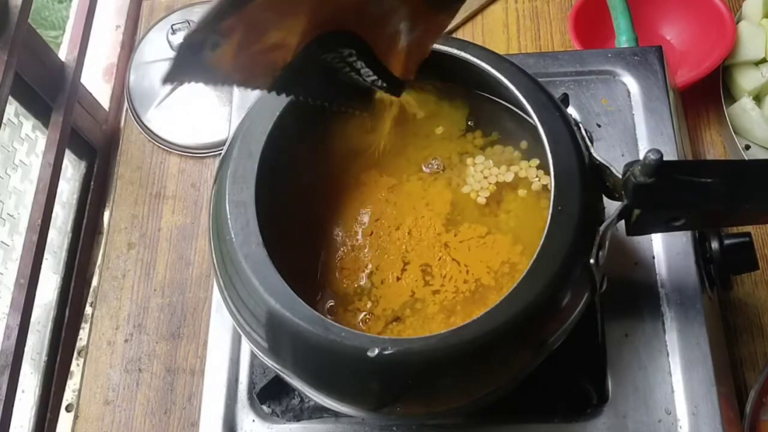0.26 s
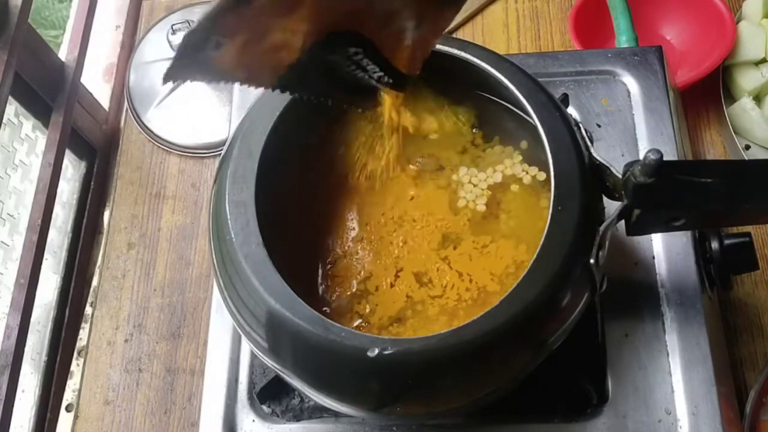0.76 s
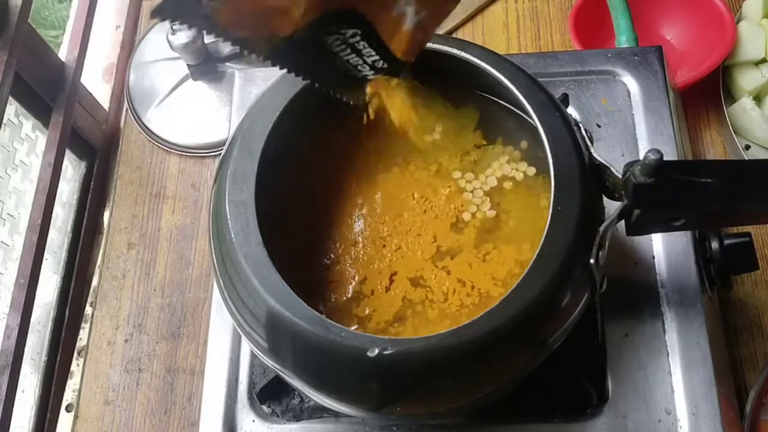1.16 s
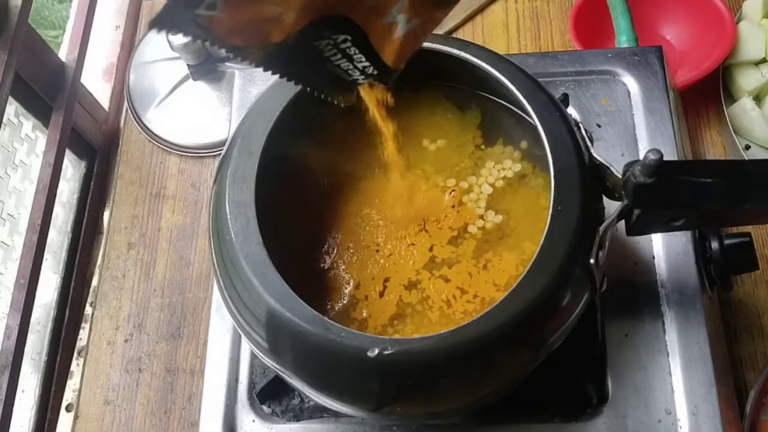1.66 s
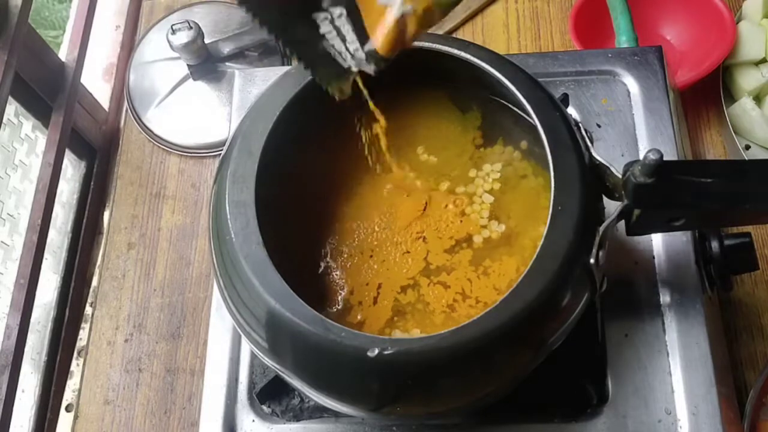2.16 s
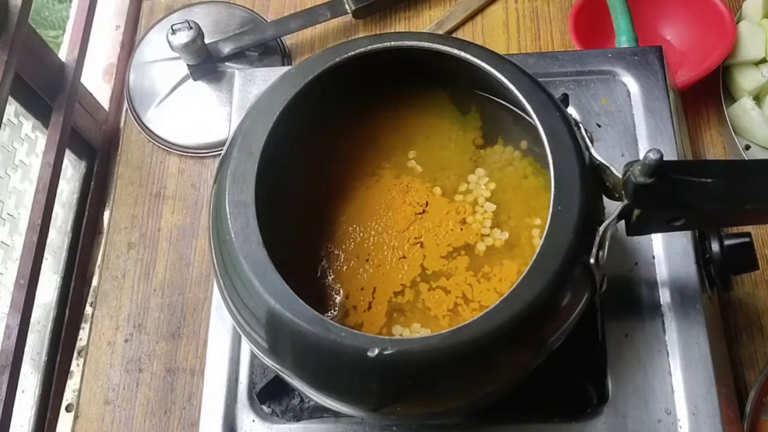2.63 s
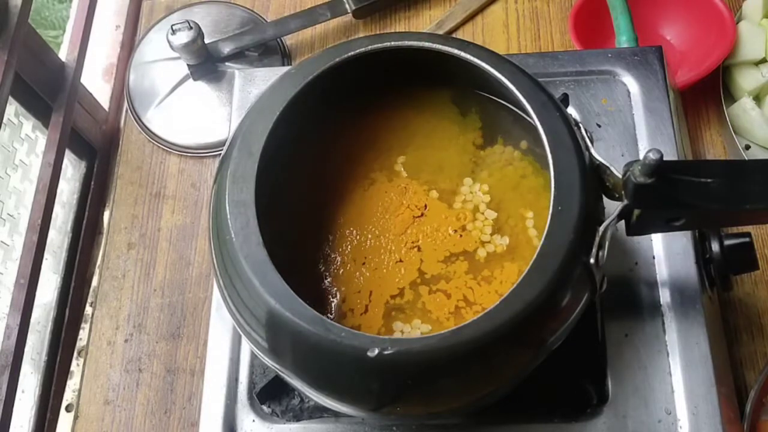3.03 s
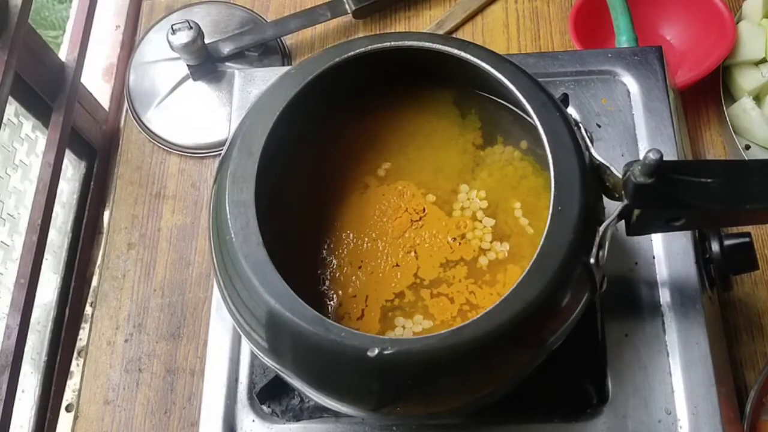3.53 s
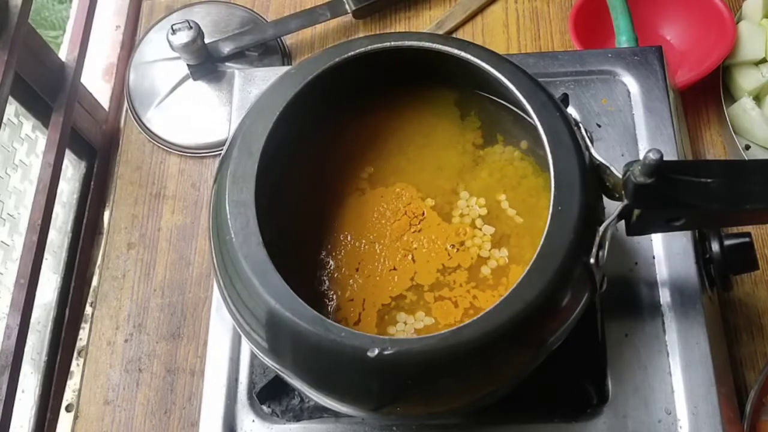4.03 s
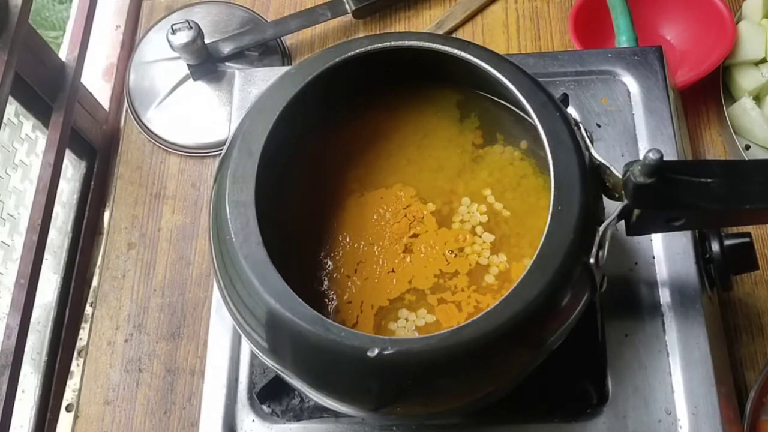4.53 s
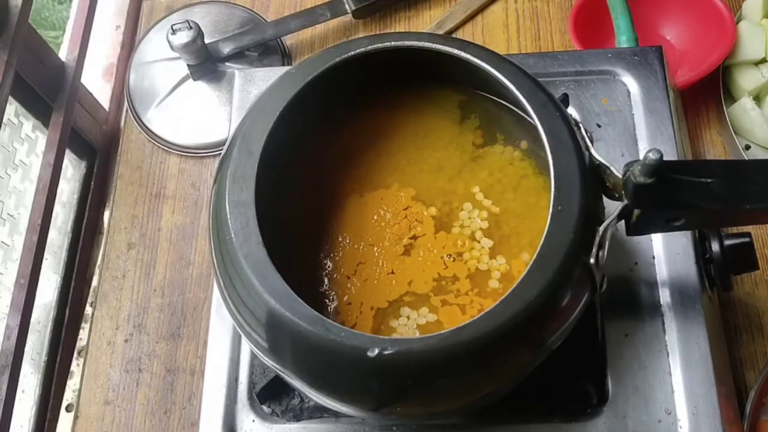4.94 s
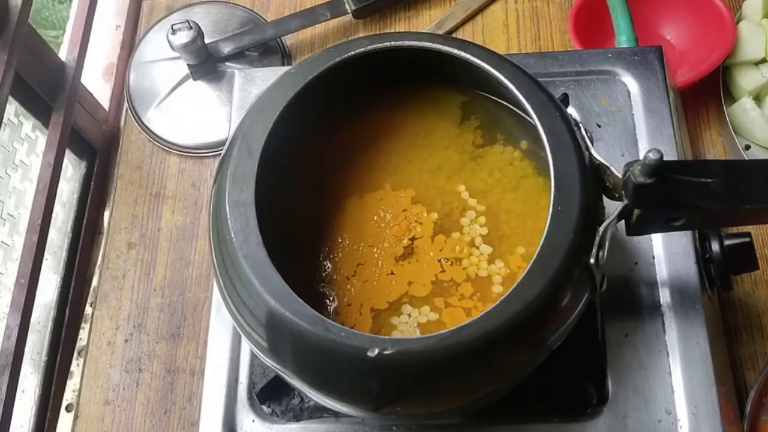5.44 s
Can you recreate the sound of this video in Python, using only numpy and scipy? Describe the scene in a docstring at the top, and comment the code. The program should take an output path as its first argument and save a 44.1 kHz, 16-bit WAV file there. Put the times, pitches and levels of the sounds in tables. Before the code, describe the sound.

A stiff plastic packet is squeezed and shaken over a pot, rustling softly while its creases let go in sharp snaps. One loud crack comes early, followed by two faint tones. Scattered snaps thin to a lull before the hardest flurry hits midway. Near the end the rustle swells and one more faint tone sounds. The packet is heard close by in a hard-walled kitchen with a low hum and thin hiss.

```python
"""A stiff plastic packet is squeezed and shaken over a pot in a hard-walled kitchen.
Tiny creases rustle from the start, over a low wavering hum and thin hiss. Bigger creases buckle in
sharp snaps that build to a crack just after half a second, and two faint tones ring. Scattered snaps
thin to a lull, then the hardest flurry hits at 3 s. The rustle surges near 4.9 s and one more tone
rings among the last snaps. The walls throw back snaps, rustle and tones throughout."""
import sys
import numpy as np
from scipy import signal
from scipy.io import wavfile
from scipy.ndimage import uniform_filter1d

SR = 44100
rng = np.random.default_rng(int(sys.argv[2]) if len(sys.argv) > 2 else 0)


def unload_wav(signal):
    """Save mono or channel-first audio to the path in sys.argv[1] as 16-bit WAV at rate SR, clipped to [-1, 1]."""
    wavfile.write(
        sys.argv[1],
        SR,
        np.round(np.clip(np.atleast_2d(signal).T, -1, 1) * 32767).astype(np.int16),
    )


N = 250973

# Single creases letting go. Each row: start in seconds, level in dB, pitch of the hollow in Hz,
# body and top weights in dB, decay time in ms.
CREASE_SNAPS = [(0.106, -37, 970, -18, -24, 1.4), (0.164, -38.5, 1760, -20.5, -21.5, 1.8),
                (0.181, -38.5, 1020, -36, -32, 2), (0.285, -38, 4140, -29, -8, 1.3),
                (0.309, -29, 990, -19, -28.5, 0.99), (0.335, -23, 2760, -18, -14, 1.66),
                (0.351, -16, 3220, -25.5, -18, 1.16), (0.392, -29, 2420, -16.5, -13, 1.33),
                (0.519, -41, 4490, -20, -12, 1.3), (0.533, -37, 3230, -19, -24, 1.3),
                (0.558, -31.5, 2030, -1, -11, 1.4), (0.568, -7.5, 4860, -21, -2.5, 2.2),
                (0.575, -20, 3360, -20, -15.5, 1.4), (0.623, -32, 3870, -31, -14, 1.1),
                (0.738, -43.5, 1130, -9, -22, 0.95), (0.757, -39.5, 970, -9, -27, 0.82),
                (0.777, -48, 961, -11, -19, 1.7), (1.079, -45, 4050, -31, -23, 1.3),
                (1.102, -46.5, 2180, -13, -18, 1.6), (1.163, -16, 5130, -23.5, -12, 1.8),
                (1.385, -37, 3890, -18, -10, 0.85), (1.401, -36, 4800, -23, -17, 2.5),
                (1.419, -40.5, 3920, -28, -17, 1.3), (1.429, -41, 3280, -27, -21, 1.3),
                (1.447, -35.5, 2710, -18, -13, 1.9), (1.501, -35, 2420, -18, -27, 1.15),
                (1.545, -36.5, 1720, -27, -21, 1.5), (1.557, -36.5, 2440, -22, -26, 0.97),
                (1.579, -23.5, 3220, -13.5, -11.5, 1.6), (1.728, -41, 1630, -19, -16, 1.4),
                (1.777, -32, 2730, -19, -18, 2), (1.807, -38.5, 3280, -30, -16, 1.7),
                (1.849, -20.5, 1510, -17, -14.5, 1.5), (1.972, -19, 4730, -36, -7, 1.85),
                (1.979, -23, 3360, -9, -11, 1.2), (2.129, -33.5, 3680, -22.5, -17, 1.27),
                (2.145, -36, 2900, -23, -15, 2.1), (2.182, -30, 2780, -20.5, -17.5, 1.85),
                (2.372, -40.5, 2530, -49, -12, 1.15), (2.638, -46, 1680, -9, -35, 1.5),
                (2.891, -39, 2480, -42, -11.5, 1.6), (2.961, -27, 3420, -27, -16, 1.3),
                (2.965, -41, 4020, -8, -17, 1.3), (2.968, -3.5, 4300, -27, -1, 1.03),
                (2.981, -32, 4370, 0, -15, 1.9), (2.993, -18, 2530, -30, -11, 0.94),
                (3.008, -31.5, 3720, -40, -28, 1.6), (3.039, -39, 1090, -18, -18, 1.3),
                (3.048, -26.5, 4120, -19, -16, 1.13), (3.056, -48, 1110, -14, 8, 1.7),
                (3.091, -10, 4100, -34.5, -23, 1.42), (3.145, -23.5, 4500, -13, -12, 1.7),
                (3.264, -40.5, 2020, -33, -6, 1.7), (3.302, -53, 3670, -30, -20, 1.5),
                (3.362, -43, 2440, -30, -28, 1.3), (3.369, -34.5, 3740, -38, -33, 1.7),
                (3.389, -32, 3920, -25.5, -21.5, 1.8), (3.441, -32.5, 3660, -38, -28, 1.5),
                (3.451, -30.5, 3760, -31.5, -20, 1.2), (3.533, -39.5, 2000, -19, -16, 1.4),
                (3.629, -21.5, 4640, -16.5, -5.5, 1.68), (3.926, -31.5, 4740, -27, -16, 2.5),
                (3.951, -35.5, 1980, -18.5, -30, 1.9), (4.003, -42.5, 3170, -19, -24, 1.5),
                (4.048, -34, 4630, -17, -16.5, 2.1), (4.054, -26, 2550, -18, -11, 1.2),
                (4.232, -46.5, 1730, -22, -28, 1.1), (4.254, -43, 1770, -20, -32, 0.94),
                (4.269, -41.5, 1730, -28, -27, 1.6), (4.486, -43, 4260, -16, -6.5, 1.3),
                (4.544, -43.5, 3800, -24, -19, 1.5), (4.78, -44, 3650, -26, -20, 2.4),
                (4.901, -34, 960, -15, -10, 2.8), (4.909, -25, 3730, -24, -6, 3.1),
                (4.957, -40, 2430, -13, -11, 1.5), (5.079, -36.5, 1260, -18.5, -13, 1.9),
                (5.166, -44, 1010, -13, -22.5, 1.1), (5.338, -31.5, 4470, -13, -1, 1.3),
                (5.391, -42.5, 2060, -21.5, -36, 1.6), (5.438, -43.5, 2720, -8.5, -21, 1.1)]
# Where a snap's body, middle and top lie, each in Hz.
SNAP_BANDS_HZ = [1027, 3120, 13200]
# Colour of the plastic film. Each row: frequency in Hz, relative level in dB.
FILM_COLOUR = [(350, -28.5), (520, -26), (700, -12.5), (1000, -5), (1500, -5), (2100, -1.5), (4100, -2.5),
               (5700, -7), (9000, 0), (12000, -2.5), (15000, 2.5)]
# How the hands work the packet. Each row: time in seconds, rustle level, body and treble gains in dB.
HANDLING = [(0, -66.5, 3.5, -9), (.25, -69, 10, -9), (.45, -63.5, -0.5, -12), (.78, -71.5, 6.5, -7.5),
            (1.0, -69, -3, -21), (1.35, -74.5, 5, -2), (1.45, -69.5, 3.5, -11), (1.9, -70, 7.5, -8.5),
            (2.2, -67, -3, -9.5), (2.6, -83.5, 15, 0), (2.7, -71.5, -8, -8), (2.85, -74, 4, -5),
            (2.95, -68, 2, -8), (3.2, -64, -1.5, -12), (3.6, -70.5, -2, -9), (3.76, -67, -1, -8),
            (3.9, -76.5, -10, -3), (4.27, -69, 6, -12), (4.42, -75.5, 8.5, -4), (4.55, -71, -7.5, -7),
            (4.76, -82, 0, 5.5), (4.79, -68, 4, 1.5), (4.87, -58.5, -0.5, -1.5), (4.91, -55.5, -5.5, -6.5),
            (4.96, -62.5, 5, -3.5), (5.14, -72.5, 5.5, -6), (5.18, -69.5, 6.5, -2.5), (5.4, -62.5, -1, -5),
            (5.52, -70, 3, -11), (5.69, -79, -4, 2)]
# Faint distant notes. Each row: start and end in seconds, pitch in Hz, level before the fade in dB.
FAR_TONES = [(.6, 0.975, 824.5, -54.5), (0.767, 0.866, 980, -63), (5.205, 5.44, 954, -58)]
# The kitchen's tail. Each row: frequency in Hz, seconds to fall by 60 dB.
KITCHEN_DECAY = [(600, 0.29), (1580, 0.16), (4180, 0.21), (11000, 0.14)]
# Slaps off the nearest surfaces. Each row: delay in seconds, gain in dB.
NEAR_ECHOES = [(.0012, -26), (.0045, -24), (.0068, -13.5)]
# Noise bands of the hum. Each row: centre in Hz, width in Hz, level in dB.
HUM_BANDS = [(122, 24, -79), (208.2, 6.3, -69.5), (246, 11, -72), (267.4, 49, -68)]
# Narrow bands standing in the hiss. Each row: centre in Hz, width in Hz, level in dB.
HISS_BANDS = [(965, 140, -79), (2357, 98, -76.5), (11060, 270, -72)]
# Low bands that swell and sink. Each row: centre in Hz, width in Hz.
SWELL_BANDS = [(122, 26), (340, 126), (640, 89)]
# Their fader moves. Each row: time in seconds, then the level in dB of each of the three bands.
SWELL_LEVELS = [(0, -79, -72.5, -100), (.35, -95, -69.5, -120), (.55, -69, -75, -70),
                (.9, -93, -71.5, -102), (1.3, -100, -79, -77.5), (1.47, -56.5, -78, -98),
                (1.7, -84, -75.5, -100), (2.4, -78, -75.5, -83.5), (2.9, -70, -86, -74.5),
                (3.05, -84, -65.5, -61.5), (3.3, -68.5, -78, -78.5), (3.75, -88, -72, -89),
                (4.27, -72.5, -69.5, -82), (4.74, -76, -82, -86.5), (4.86, -67, -66, -95),
                (5.1, -82, -72.5, -100), (5.69, -67, -74.5, -81)]
# Colour of the rumble. Each row: frequency in Hz, relative level in dB.
RUMBLE_COLOUR = [(24, -68.5), (40, -37), (70, -61.5), (113, -15), (177, -10), (207, 1), (388, -24.5),
                 (430, -27), (877, -19), (1300, -69), (1690, -73), (2860, -120)]
# Colour of the hiss. Each row: frequency in Hz, relative level in dB.
HISS_COLOUR = [(760, -65), (1300, -40.5), (1430, 0.5), (1700, -2), (1910, -22.5), (2350, -11),
               (2840, -36.5), (2960, -27), (4970, -16), (5350, -11.5), (6120, -25), (6930, -8.5),
               (7530, -13.5), (11000, -8), (15600, -3.5)]
# Reach of the noise suppressor. Each row: frequency in Hz, deepest cut in dB (no cut below zero).
SUPPRESSOR_DEPTH = [(400, 4.5), (700, 20), (950, 6.5), (1250, 18), (1700, 1.5), (2100, 1.5), (2800, 10.5),
                    (3600, 6.5), (4500, -5.5), (6000, 0), (9000, 1)]

SNAP_MIDDLE_DB, BUCKLE_S = -17.5, .0009  # weight of a snap's middle; strain time before it lets go
STEP_DB, STEP_SHARE = 17, .4  # the harder the snap, the more of it is one step
TICKS_PER_S = 2200
SETTLE_DB, SETTLE_SHARE, SETTLE_RISE_S, SETTLE_T60_S = -52.5, 0.46, 0.0042, 0.6
FLUTTER_HZ, FLUTTER_DEPTH = 9, .5
HUM_CORE_HZ, HUM_CORE_DB = 210.7, -68
WHINE_HZ, WHINE_DRIFT_HZ, WHINE_WIDTH_HZ, WHINE_DB = 1651, 45.48, 92, -72
RUMBLE_DB, HISS_DB = -64, -58.5
HIGH_CUT_HZ = 15650


def crease_snaps():
    """Each crease strains, lets go and shivers out in milliseconds. Returns direct sound and room send."""
    direct, room_send = np.zeros((2, N))
    hz, t = np.fft.rfftfreq(1024, 1 / SR), np.arange(512) / SR
    shivers = rng.standard_normal((len(CREASE_SNAPS), 512))
    for (start, db, hollow_hz, body_db, top_db, decay_ms), shiver in zip(CREASE_SNAPS, shivers):
        band_db = np.array([body_db, SNAP_MIDDLE_DB, top_db]) - 10 * np.log10(SNAP_BANDS_HZ)
        colour_db = at_hz([(400, body_db - 41.5), *zip(SNAP_BANDS_HZ, band_db)], hz)
        # the pocket of film around the crease rings
        hollow_db = 9.3 / (1 + ((hz - hollow_hz) / (0.11 * hollow_hz)) ** 2)
        film = impulse_response(colour_db + hollow_db + 0.5 * at_hz(FILM_COLOUR, hz))[:512]
        burst = shiver * np.minimum(t / BUCKLE_S, 1) ** 2 * np.exp(-1000 * t / decay_ms)
        burst[round(BUCKLE_S * SR)] += gain_of(STEP_DB + STEP_SHARE * db)  # buckling is one sharp step
        snap = np.convolve(burst, film)
        snap *= gain_of(db + 1.0) / abs(snap).max()
        add(direct, start, snap)
        # the room hears the snap from all directions, without the chance dips of one path
        add(room_send, start, film * np.linalg.norm(snap) / np.linalg.norm(film))
    return direct, room_send


def rustle():
    """Many tiny creases tick: harder handling is louder, wide folds add body, tight ones treble."""
    db, body_db, treble_db = automation(HANDLING)
    sizes = gain_of(2.0 * np.minimum(rng.exponential(1, N), 4))
    ticks = sizes * (rng.random(N) < TICKS_PER_S / SR)
    shiver = signal.lfilter([1], [1, -np.exp(-1 / (0.00055 * SR))], ticks)  # 0.55 ms decay per tick
    crackle = unit_rms((shiver + 0.28) * rng.standard_normal(N))
    film = impulse_response(at_hz(FILM_COLOUR, np.fft.rfftfreq(1024, 1 / SR)))[:512]
    crinkle = signal.oaconvolve(crackle, film)[:N]
    crossovers = [signal.butter(4, hz, fs=SR, output="sos") for hz in (1500, 5600)]
    body, below_top = (signal.sosfiltfilt(lowpass, crinkle) for lowpass in crossovers)
    middle, top = below_top - body, crinkle - below_top
    level = np.sqrt(gain_of(db) ** 2 + settling_power())
    return level * (gain_of(body_db) * body + middle + gain_of(treble_db) * top) / middle.std()


def settling_power():
    """The film rustles on after each snap, swelling fast and dying away; hard snaps leave more."""
    kicks, t = np.zeros(N), np.arange(SR // 2) / SR
    for start, db, *_ in CREASE_SNAPS:
        add(kicks, start, gain_of([SETTLE_DB + SETTLE_SHARE * db]) ** 2)
    envelope = (1 - np.exp(-t / SETTLE_RISE_S)) * gain_of(-60 * t / SETTLE_T60_S)
    return abs(signal.oaconvolve(kicks, envelope ** 2)[:N])


def far_tones():
    """Faint sine notes that come in quickly, flutter and fade."""
    tones = np.zeros(N)
    for start, end, hz, db in FAR_TONES:
        t = np.arange(0, end - start, 1 / SR)
        fade = np.minimum(t / 0.0053, 1) * gain_of(-14.0 * t / t[-1])
        flutter = 1 + FLUTTER_DEPTH * np.cos(2 * np.pi * FLUTTER_HZ * (t - .05))
        add(tones, start, gain_of(db) * fade * flutter * np.sin(2 * np.pi * hz * t))
    return tones


def kitchen_reverb(send, wet_db):
    """Hard surfaces answer with a few near slaps and a tail in which each band dies at its own speed."""
    taps = np.zeros(SR // 2)
    arrivals = np.arange(100, SR // 2 - 10, 10) + rng.integers(0, 10, (SR // 2 - 101) // 10)
    taps[arrivals] = rng.choice([-1., 1.], arrivals.shape)
    hz, t, spectra = signal.stft(taps, SR, nperseg=128)
    late = gain_of(-60 * t / at_hz(KITCHEN_DECAY, hz)[:, None])
    # the counter and pot crowd the first moments
    early = 2.74 * gain_of(-60 * t / 0.022) / (1 + (hz[:, None] / 7000) ** 2)
    tail = signal.istft(spectra * (late + early), SR, nperseg=128)[1]
    tail *= gain_of(wet_db) / np.linalg.norm(tail)
    for delay, db in NEAR_ECHOES:
        tail[round(delay * SR)] += gain_of(db)
    return signal.fftconvolve(send, tail)[:N]


def room_tone():
    """The bed: a hum wavering round a steady core, low swells, a drifting whine, rumble and hiss."""
    bands = sum(gain_of(db) * band_noise(hz, width) for hz, width, db in HISS_BANDS + HUM_BANDS)
    swells = sum(gain_of(db) * band_noise(hz, width)
                 for db, (hz, width) in zip(automation(SWELL_LEVELS), SWELL_BANDS))
    whine = gain_of(WHINE_DB) * band_noise(WHINE_HZ + WHINE_DRIFT_HZ * drift(2), WHINE_WIDTH_HZ)
    rumble = gain_of(RUMBLE_DB) * patchy_noise(RUMBLE_COLOUR, patchy_db=.8)
    hiss = gain_of(HISS_DB) * patchy_noise(HISS_COLOUR, patchy_db=.8)
    hum_core = gain_of(HUM_CORE_DB) * unit_rms(np.sin(2 * np.pi * HUM_CORE_HZ * np.arange(N) / SR))
    return hum_core + rumble + hiss + bands + swells + whine


def band_noise(hz, width_hz):
    """Noise through a narrow resonance applied twice, rms 1; hz may glide."""
    pole = np.exp(-np.pi * width_hz / SR)
    noise = rng.standard_normal((N, 2)) @ [1, 1j]
    waver = signal.lfilter([1], np.convolve([1, -pole], [1, -pole]), noise)
    carrier = np.exp(2j * np.pi * np.cumsum(hz * np.ones(N)) / SR)
    return unit_rms((waver * carrier).real)


def patchy_noise(colour, patchy_db):
    """Coloured noise with faint patches that come and go, rms 1."""
    frames, hz = N // 512 + 5, np.fft.rfftfreq(2048, 1 / SR)
    real, imag, patches = rng.standard_normal((frames, 1025, 3)).T
    patches = unit_rms(uniform_filter1d(uniform_filter1d(patches, size=30, axis=0), size=8, axis=1))
    spectra = (real + 1j * imag) * gain_of(at_hz(colour, hz)[:, None] + patchy_db * patches)
    return unit_rms(signal.istft(spectra, nperseg=2048, noverlap=1536)[1][:N])


def drift(fastest_hz):
    """A slow random wander, rms 1."""
    t, phase = np.arange(N // 64 + 2) * 64 / SR, rng.random((24, 1))
    hz = np.geomspace(.2, fastest_hz, num=24)[:, None]
    waves = np.sin(2 * np.pi * (hz * t + phase)) / np.sqrt(hz)
    return np.interp(np.arange(N) / SR, t, unit_rms(waves.sum(axis=0)))


def impulse_response(db):
    """The minimum-phase click of an EQ curve given in dB on rfft bins."""
    log_gain = np.log(gain_of(np.maximum(db, -100)))
    mirrored = np.concatenate([log_gain, log_gain[-2:0:-1]])
    return np.fft.ifft(np.exp(np.conj(signal.hilbert(mirrored)))).real


def automation(rows):
    """One fader curve, sample by sample, for each column after the time."""
    times, *columns = np.transpose(rows)
    return [np.interp(np.arange(N) / SR, times, column) for column in columns]


def at_hz(points, hz):
    """Straight lines between (Hz, value) points on a log-frequency axis."""
    point_hz, values = np.transpose(points)
    return np.interp(np.log(hz + 1), np.log(point_hz + 1), values)


def add(mix, start_s, sound):
    part = mix[round(start_s * SR):][:len(sound)]
    part += sound[:len(part)]


def gain_of(db):
    return 10 ** (np.asarray(db) / 20)


def unit_rms(x):
    return x / np.sqrt(np.mean(x ** 2) + 1e-20)


def scene():
    """Snaps, rustle and tones with their reverb, laid over the room tone in mono."""
    snaps, snap_send = crease_snaps()
    soft_layers = rustle() + far_tones()
    reverb = kitchen_reverb(snap_send + soft_layers, wet_db=-4.5)
    return (snaps + soft_layers + reverb + room_tone())[None]


def record(dry):
    """A noise suppressor ducks bands near their quietest level, mostly in the mids; then a high cut."""
    hz, _, spectra = signal.stft(dry[0], SR, nperseg=1024, noverlap=768)
    power = uniform_filter1d(uniform_filter1d(abs(spectra) ** 2, size=5, axis=0), size=11, axis=1)
    over_floor_db = 10 * np.log10(power / np.percentile(power, 12, axis=1)[:, None])
    ducking = uniform_filter1d(np.clip(1.5 - over_floor_db / 2.82, 0, 1), size=5, axis=1)
    cut_db = np.maximum(at_hz(SUPPRESSOR_DEPTH, hz), 0)[:, None] * ducking
    clean = signal.istft(spectra / gain_of(cut_db), SR, nperseg=1024, noverlap=768)[1][None, :N]
    high_cut = signal.firwin(1023, HIGH_CUT_HZ, window=("kaiser", 9), fs=SR)
    return signal.oaconvolve(clean, high_cut[None], "same")


dry = scene()
out = record(dry)
unload_wav(out)
```